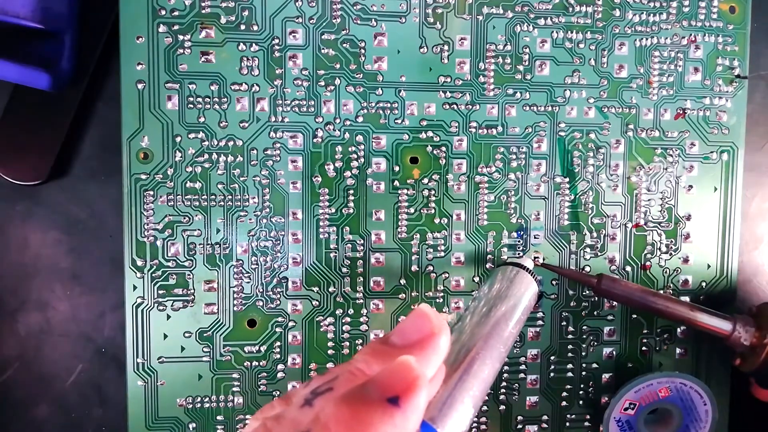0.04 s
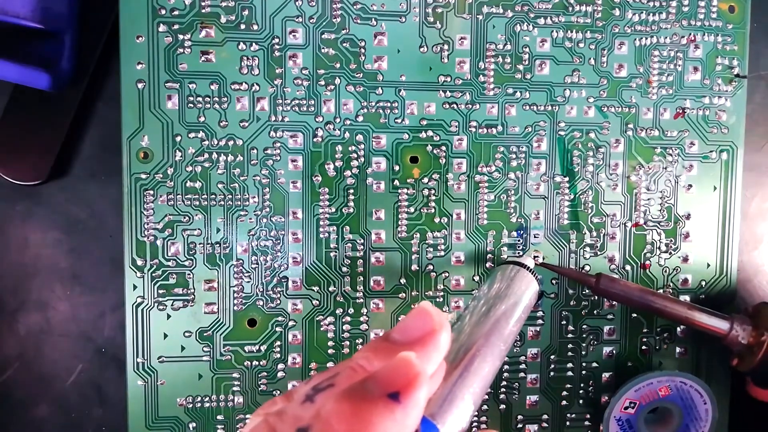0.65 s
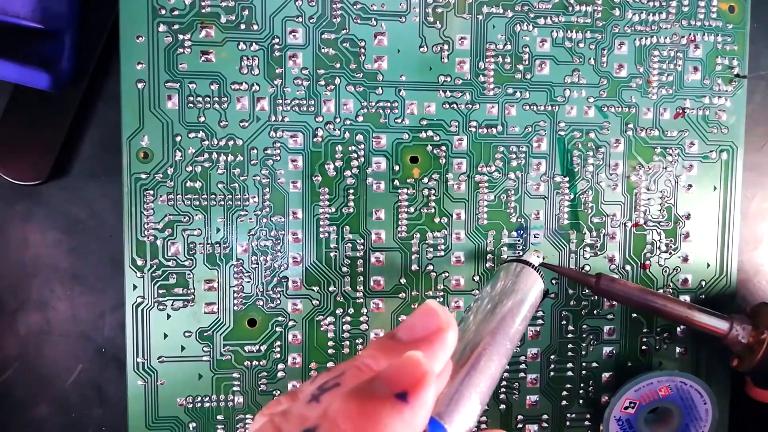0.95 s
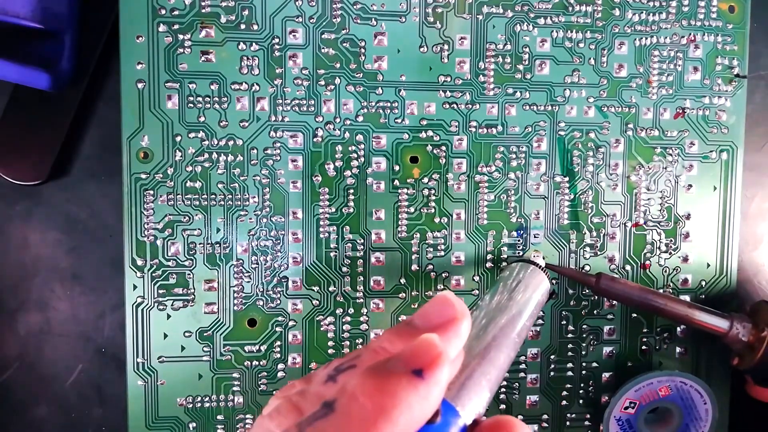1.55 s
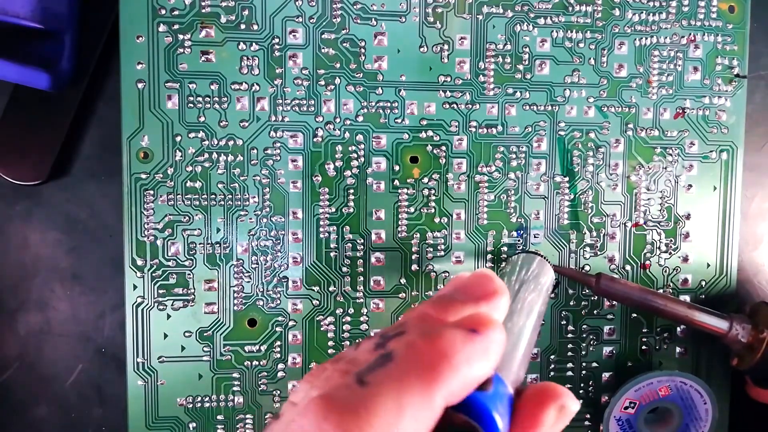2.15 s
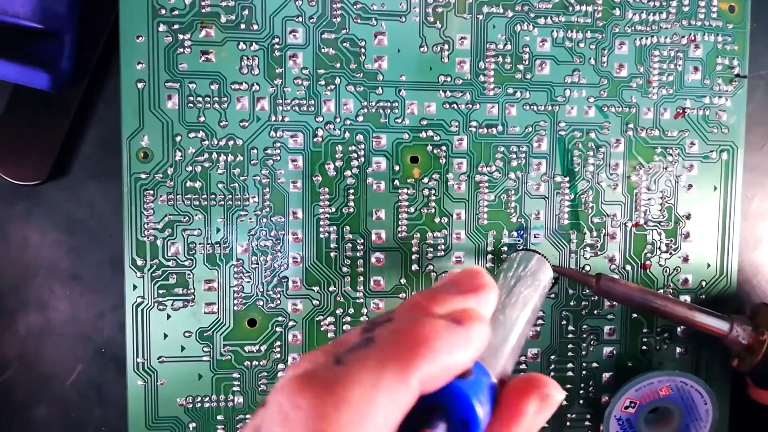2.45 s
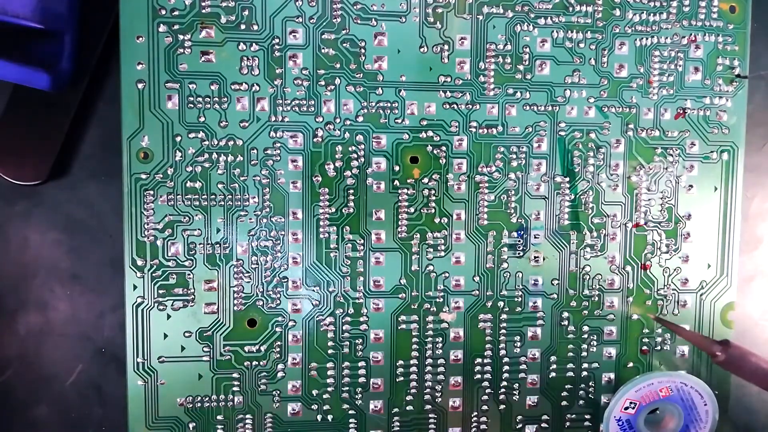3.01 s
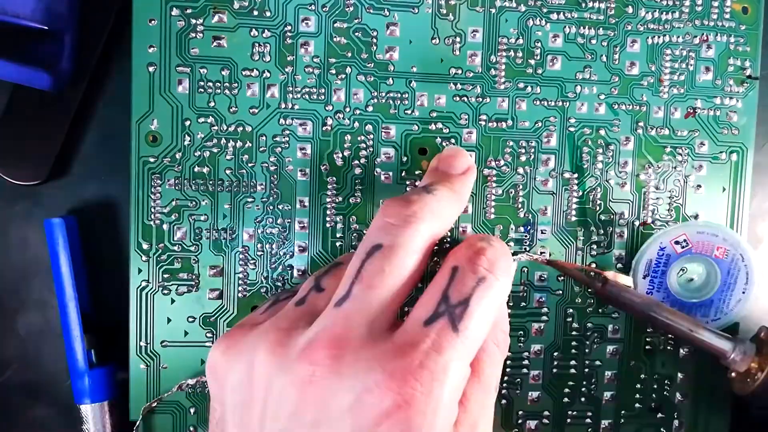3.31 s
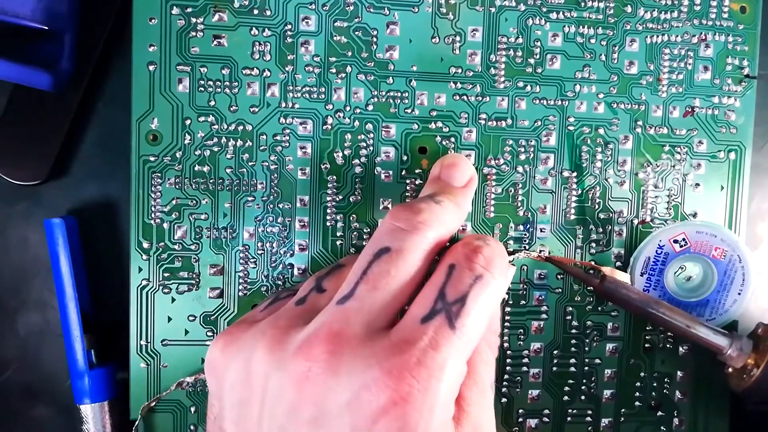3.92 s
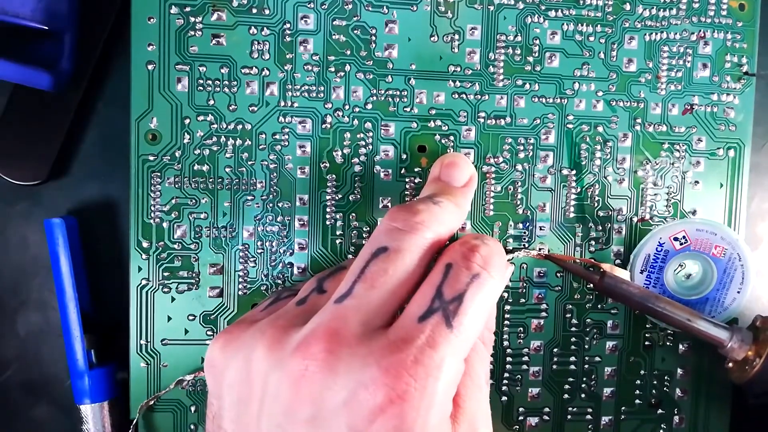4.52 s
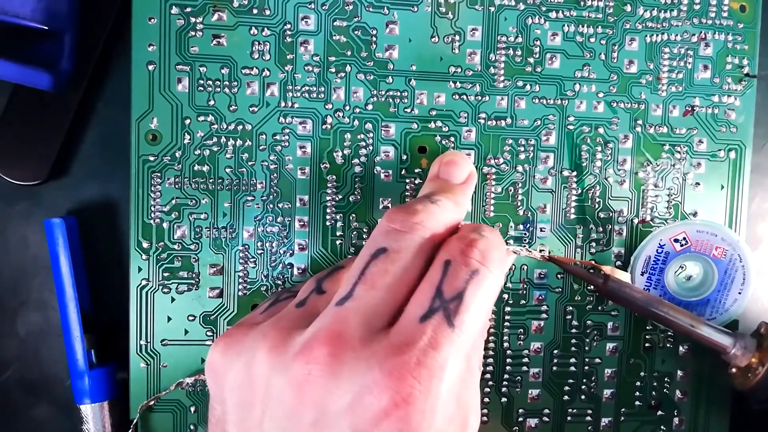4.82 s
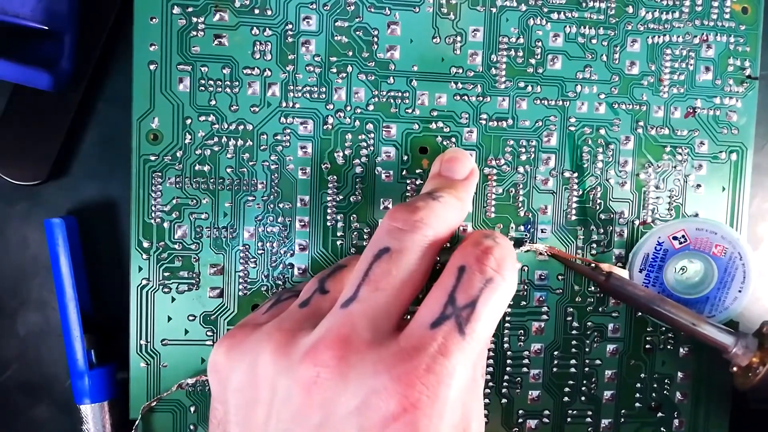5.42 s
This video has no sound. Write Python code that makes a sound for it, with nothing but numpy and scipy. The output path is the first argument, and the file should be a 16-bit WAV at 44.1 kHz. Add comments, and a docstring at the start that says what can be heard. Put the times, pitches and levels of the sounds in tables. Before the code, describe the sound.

Close up in a small workroom, a solder pump is set on a circuit board with a tick and a knock. Its plastic nozzle creaks in short runs, and flux sizzles faintly under a soldering iron. The plunger then snaps back sharply, the loudest sound, leaving the spring rattling and ringing briefly. Afterwards the iron pings once and tools tick, scratch and knock lightly over faint room hiss.

```python
"""A tick and a knock over faint room hiss: a solder pump is set down on a circuit board, close by.
Its nozzle creaks as it sticks and slips, and flux sizzles under the hot soldering iron. The pump's
plunger snaps back, leaving its spring and barrel ringing. Afterwards the iron pings once, and the
tools tick, scratch and knock lightly on the board. A small workroom adds a short echo."""
import sys
import numpy as np
from scipy import signal
from scipy.fft import rfft, irfft, next_fast_len
from scipy.io import wavfile
from scipy.ndimage import uniform_filter1d

SR = 44100
rng = np.random.default_rng(int(sys.argv[2]) if len(sys.argv) > 2 else 0)


def persist_wave(psi):
    """Save psi, clipped to +-1, as 16-bit WAV."""
    counts = np.round(np.clip(psi, -1, 1) * 32767).astype(np.int16)
    wavfile.write(sys.argv[1], SR, np.atleast_2d(counts).T)


N = 245306
T = np.arange(SR // 3) / SR  # seconds within one contact


def amp(db):
    """Turn decibels into a gain."""
    return 10 ** (np.asarray(db) / 20)


def unit(x):
    """Scale a sound to an average (rms) strength of 1."""
    return x / np.sqrt(np.mean(x ** 2) + 1e-20)


def blow(x):
    """Give a contact the energy of 4 ms of sound at strength 1."""
    return unit(x) * np.sqrt(.004 * SR / x.shape[-1])


def along(points, hz):
    """Read a curve of (pitch_hz, value) points at hz, on a log pitch scale."""
    pitches, values = np.transpose(points)
    return np.interp(np.log(hz + 1), np.log(pitches + 1), values)


def panned(db):
    """Left and right gains; a positive pan makes the left side louder."""
    return amp(np.array([[.5], [-.5]]) * db)


def coloured(x, gain):
    """Filter a sound by gain(hz), so that no ringing comes before its cause."""
    size = next_fast_len(x.shape[-1] // 2 + 4096) * 2
    cepstrum = irfft(np.log(np.maximum(gain(np.fft.rfftfreq(size, 1 / SR)), 1e-6)), size)
    cepstrum[..., 1:size // 2] *= 2
    cepstrum[..., size // 2 + 1:] = 0
    return irfft(rfft(x, size) * np.exp(rfft(cepstrum)), size)[..., :x.shape[-1]]


def add(track, start_s, sound):
    """Mix a sound into the track."""
    part = track[:, max(round(start_s * SR), 0):][:, :sound.shape[-1]]
    part += sound[..., :part.shape[1]]


def scattered(start_s, end_s, count):
    """Random moments, spread loosely over a stretch of time."""
    return start_s + (end_s - start_s) * (np.arange(count) + rng.random(count)) / count


def envelope(full_s, level_db, rise_s, hold_s, fade_s):
    """A gain that rises 60 dB in rise_s to its level at full_s, holds, then falls 60 dB in fade_s."""
    t = np.arange(N) / SR - full_s
    return amp(level_db - 60 * np.maximum(-t, 0) / rise_s - 60 * np.maximum(t - hold_s, 0) / fade_s)


def crack(fade_s, alike=0):
    """A burst of noise that falls 60 dB in fade_s; alike is the share both microphones have in common."""
    common = np.sqrt(alike) * rng.standard_normal(len(T))
    separate = np.sqrt(1 - alike) * rng.standard_normal((2, len(T)))
    return (common + separate) * amp(-60 * T / fade_s)


def ring(tones, t, spread, vary_db, drift=0):
    """Fading tones of a struck object; spread puts left and right out of step, drift roughens them."""
    hz, db, fade_s = np.transpose(tones)[:, :, None]
    strength = amp(db + vary_db * rng.standard_normal(hz.shape) - 60 * t / fade_s)
    wander = drift * np.cumsum(rng.standard_normal(strength.shape), axis=1) / np.sqrt(SR)
    offset = spread * rng.standard_normal((2, len(hz), 1))
    return np.sum(strength * np.sin(2 * np.pi * hz * t + wander + offset), axis=1)


def rustle(colour, grain_db):
    """Stereo noise whose strength flickers from millisecond to millisecond."""
    grain = unit(uniform_filter1d(rng.standard_normal(N), size=60))
    noise = rng.standard_normal((2, N)) * amp(grain_db * grain)
    return unit(coloured(noise, lambda hz: amp(along(colour, hz))))


def background():
    """The room rumbles under the microphones' own hiss; the level dips briefly around the snap."""
    # tone of the rumble and hiss: pitch_hz, level_db
    colour = [(12, -42), (20, -1), (48, -9), (81, -2), (182, -7), (216, -7.5), (347, -15.5), (607, -14.5),
              (759, -18), (976, -17), (1060, -17), (1570, -21.5), (2750, -23.5), (9140, -26.5),
              (16000, -33)]
    # their left-right balance: pitch_hz, pan_db
    balance = [(60, 0), (180, 0.0), (550, -1.0), (1650, 0), (4970, 0), (15000, 0.5)]
    # how alike the two sides are: pitch_hz, likeness (1 same, -1 opposite)
    likeness = [(60, 1), (180, 0.92), (550, -0.35), (1650, 0.2), (4970, -0.083), (15000, -0.027)]
    # the dip: start_s, fall_s, hold_s, recovery_s
    dip = (1.934, 0.021, 0.28, 0.22)

    def mid_and_side(hz):
        angle = np.arccos(np.clip(along(likeness, hz), -.99, .99)) / 2
        return amp(along(colour, hz)) * np.array([np.cos(angle), np.sin(angle)])

    mid, side = coloured(rng.standard_normal((2, N)), mid_and_side)
    noise = coloured(np.array([mid + side, mid - side]), lambda hz: panned(along(balance, hz)))
    dip_db = 8.5 * np.interp(np.arange(N) / SR, np.cumsum(dip), [0, 1, 1, 0])
    return amp(-60.5 - dip_db) * unit(noise)


def tip(level_db, tilt, pan_db, fade_s):
    """One contact of metal on solder; tilt brightens it, in dB per octave."""
    # tone of the contact: pitch_hz, level_db
    colour = [(400, -25.5), (1000, -6.5), (2000, -13), (3300, -4.5), (4300, -12), (5400, -7), (6600, -6),
              (8100, 0.5), (9200, -0.5), (11000, 1.5), (12500, -6.5), (15500, -4.5)]
    gain = lambda hz: amp(along(colour, hz) + tilt * np.log2(np.maximum(hz, 500) / 8000))
    return amp(level_db) * blow(coloured(crack(fade_s, alike=0.2), gain)) * panned(pan_db)


def ticks():
    """Metal tips touch the joints: short contacts tick, longer ones scratch."""
    # tips touching pins: start_s, level_db, pan_db
    taps = [(.2025, -36, 2), (1.816, -52.5, 4), (1.932, -54.5, 1), (2.0579, -52.5, 2), (2.0891, -47, 1.5),
            (2.3887, -48, -6.5), (2.4738, -49.5, -3), (2.531, -50.5, -3), (2.8468, -49, -4),
            (3.069, -53, 2), (3.635, -38.5, -0.5), (3.724, -53, 0), (5.304, -57.5, 1), (5.433, -57, 3)]
    # the tip scratching over solder: start_s, level_db, tilt_db_per_octave, pan_db
    scratches = [(4.718, -46, 2, 4), (4.7374, -40, 5, 0), (4.838, -36.5, -1.5, -2.5), (4.855, -42.5, -3, 1)]
    tip_shifts = [(start_s, -61, 0) for start_s in scattered(3.65, 5.2, count=5)]
    out = np.zeros((2, N))
    for start_s, level_db, pan_db in taps + tip_shifts:
        add(out, start_s, tip(level_db, tilt=-1.5, pan_db=pan_db, fade_s=0.022))
    for start_s, level_db, tilt, pan_db in scratches:
        add(out, start_s, tip(level_db, tilt, pan_db, fade_s=0.06))
    return out


def board(hz, place, vary_db):
    """The board favours certain pitches, in a mix set by where it is struck."""
    # the board's resonances: pitch_hz, width_hz, level_db, extra_at_edge_db
    resonances = [(320, 160, -17, 10), (695, 54, -3.5, -5), (754, 114, 3, -5), (955, 260, -5, 4.5),
                  (1140, 140, -7, 10.5), (1308, 120, -2, -2.5), (1545, 117, -6, -6.5),
                  (2360, 470, -29, -14.5)]
    gains = []
    for centre, width, level_db, edge_db in resonances:
        peak = (hz * width / np.abs(centre ** 2 - hz ** 2 + 1j * hz * width)) ** 1.14
        gains.append(amp(level_db + place * edge_db + rng.normal(0, vary_db)) * peak)
    return np.linalg.norm(gains, axis=0)


def knocks():
    """A push and a brief rattle shake the board; harder contacts are brighter."""
    # tools landing: start_s, relative_db, hardness_db_per_octave, place (-1 middle, 1 edge)
    landings = [(.203, -18, -2, 0.76), (.254, -34, 10, -.4), (0.3104, -37.5, 2.5, -0.79),
                (0.344, -43.5, 6, -0.32), (.5101, -38.5, 13, 0.0071), (1.816, -43, -5, 0.29),
                (2.1996, -34, 6, .7), (3.6716, -41.5, -1, 0.37), (3.724, -33, -11, 0.099),
                (3.833, -40.5, 3, -1.27), (3.894, -47.5, -5, 0.2), (4.2454, -25, -1, -1.55),
                (4.2515, -33.5, 4, -1.1), (4.672, -39, -6, 0.64), (4.71, -38, 5.5, -0.26),
                (4.751, -39.5, 8, -0.69), (4.862, -41.5, 3, 0.26), (4.8919, -40, -3.5, 0.89),
                (5.03, -38.5, -4.5, 1), (5.063, -42.5, -3, .95), (5.113, -41, -2, 1)]
    # each tool grazes the board just before it lands
    grazes = [(s - 0.00338, db - 18.5, hardness, place) for s, db, hardness, place in landings]
    # light touches while the hand takes a new hold
    touches = [(s, rng.normal(-50.5, 1.5), 0, rng.uniform(-1, 1)) for s in scattered(3.3, 3.65, count=4)]
    pump_lift_s, firm_db = 2.7, -40
    out = np.zeros((2, N))
    for start_s, db, hardness, place in landings + grazes + touches:
        fade_s = 0.027 if start_s < pump_lift_s else 0.058  # the pressing pump damps the board
        fade_s *= amp(-0.29 * max(db - firm_db, 0))  # firm knocks rattle for less long
        force = blow(crack(fade_s, alike=0.72) * (1 - np.exp(-T / 0.00062)))
        force[:, 0] += 9  # the push
        tilt = lambda hz: amp(hardness * np.log2(np.clip(hz, 400, 2400) / 1000))
        contact = lambda hz: tilt(hz) / (1 + (hz / 2800) ** 8)
        knock = coloured(force, lambda hz: board(hz, place, vary_db=2.5) * contact(hz))
        add(out, start_s, amp(db - 7.5) * blow(knock))
    return out * panned(-3.0)


def thumps():
    """Firm pushes rock the board on the bench, which gives off little deep bass."""
    # pushes that reach the bench: start_s, relative_db, hardness_db_per_octave
    pushes = [(.203, -36, 3.5), (.251, -46.5, -10), (1.815, -40, 1), (1.891, -54, -3), (2.184, -37, -2.5),
              (2.474, -51.5, 2), (3.724, -51.5, 2), (4.756, -49.5, 2)]
    # the bench's low tones: pitch_hz, level_db, fade_s
    bench = [(87.6, -2, 0.19), (118, 0, 0.14), (140, 2.5, 0.13), (194, -2.5, 0.082), (239.6, -5, 0.094),
             (375, -11.5, 0.06)]
    onset = 1 - np.exp(-T / 0.00099)
    out = np.zeros((2, N))
    for start_s, push_db, hardness in pushes:
        tones = [(hz, db + hardness * np.log2(hz / 140), fade_s) for hz, db, fade_s in bench]
        thump = ring(tones, T, spread=.04, vary_db=0.5) * onset
        add(out, start_s, amp(push_db + 7) * blow(thump))
    return coloured(out, lambda hz: hz ** 2 / np.hypot(hz ** 2, 65 ** 2))


def slide():
    """The nozzle rubs smoothly over the board before it catches."""
    # tone of the rubbing: pitch_hz, level_db
    colour = [(700, -3), (2000, -5.5), (3100, -5.5), (4300, -13), (5400, -18), (7000, -4), (10000, -0.5),
              (13500, -6), (16000, -8.5)]
    # the sliding move: full_s, level_db, rise_s, hold_s, fade_s
    move = (.315, -49, .17, .065, .25)
    return envelope(*move) * rustle(colour, grain_db=2.5) * panned(2.7)


def slip_times(first_s, stuck_s, last_s, count, slowing):
    """The nozzle breaks away once, sticks, then slips in a run that may slow toward its end."""
    progress = np.linspace(0, 1, count - 1)
    progress -= slowing * progress * (1 - progress)
    run = first_s + stuck_s + (last_s - first_s - stuck_s) * progress
    return np.append(first_s, run) + rng.normal(0, .0005, count)


def creak():
    """The nozzle sticks and slips: each slip is a tick and a swell of plastic vibration."""
    # pushes on the nozzle: first_slip_s, stuck_s, last_slip_s, slip_count, slowing (0 to 1)
    pushes = [(.3522, .0105, .4244, 8, 0), (.4392, .0118, .485, 5, 0), (.5101, .0125, .5327, 3, 0),
              (.553, .0105, .6459, 12, .04), (.7209, .0176, .7841, 7, 0), (.8397, .0312, .9158, 8, .18),
              (.9775, .0207, 1.0502, 6, .4)]
    # pressure on the nozzle, as the strength of a slip: time_s, relative_db
    pressure = [(.39, -44.5), (.45, -39), (.52, -35.5), (.75, -35), (1.05, -38)]
    # tone of the plastic: pitch_hz, relative_db
    colour = [(180, -53), (300, -38), (405, -22.5), (774, -5.5), (1040, -9), (1390, -5.5), (1900, -17),
              (2610, -6.5), (3890, -13), (4520, 0), (5250, -13.5), (5800, -5.5), (7440, -6.5), (12100, -1),
              (16000, -7.5)]
    # its left-right balance: pitch_hz, pan_db
    balance = [(300, 0), (750, -12), (1400, 0.5), (2600, -4.5), (3400, 19), (5000, -4), (10000, 4),
               (13000, 10)]
    swell = 1 - np.exp(-T / .0009)
    shell = crack(fade_s=.010, alike=.3)  # every slip shakes the same shell
    slips = np.zeros((2, N))
    for push in pushes:
        times = slip_times(*push)
        levels_db = np.interp(times, *np.transpose(pressure))
        levels_db[0] += 1  # breaking away takes extra force
        for start_s, db in zip(times, levels_db):
            variation = amp(-3) * crack(fade_s=.012)
            slip = blow((shell + variation) * swell)
            slip[:, 0] += 4.5  # the tick
            add(slips, start_s, amp(db + rng.normal(0, 0.9)) * slip)
    return coloured(slips, lambda hz: amp(along(colour, hz) + 2.5) * panned(along(balance, hz)))


def sizzle():
    """Flux, the cleaning paste in solder, boils off the hot joint."""
    # a slow simmer and one spit: full_s, level_db, rise_s, hold_s, fade_s
    boils = [(1.92, -65.5, 1, 0.021, 0.09), (1.824, -47.5, .035, 0.011, 0.094)]
    # tone of the boiling: pitch_hz, level_db
    colour = [(1000, -13), (6500, -16), (8500, -7), (10000, 5.5), (12500, -6.5), (13800, -17),
              (14800, -14.5), (16000, -32)]
    return sum(envelope(*boil) for boil in boils) * rustle(colour, grain_db=4.0) * panned(-5.0)


def pump():
    """The plunger flies back and strikes its stop; spring and barrel ring on."""
    # release, blow and rebound: start_s, level_db, fade_s, tilt_db_per_octave, pan_db
    hits = [(2.1825, -26.5, 0.067, 1.5, -4.5), (2.187, -22, 0.015, 3, -3.5), (2.199, -21, 0.017, 0, 2)]
    # tone of the snap: pitch_hz, level_db
    colour = [(150, -37), (250, -6), (557, -15), (802, -6.5), (1420, -9.5), (1730, -4.5), (2320, -8),
              (3010, -5), (3230, -13), (3840, -7.5), (4190, -13.5), (5630, -15), (6360, -13), (10500, -6.5),
              (16000, -34)]
    # its left-right balance: pitch_hz, pan_db
    balance = [(300, 7), (700, -6), (1200, -0.5), (1700, 13), (2700, -4), (5000, 0.5), (10000, -7),
               (14000, -2)]
    # the spring's tones: pitch_hz, relative_db, fade_s
    spring_tones = [(1790, -4.5, 0.35), (2410, -14.5, .25), (2710, -11, 0.2), (3030, -17, 0.26),
                    (3350, -13, 0.27), (4969, -25, .23), (6000, -9, .4), (6950, -11, .25), (7800, -9, 0.49),
                    (9100, -8.5, .3), (10000, -20, .33), (10100, -21, 0.51), (11550, -1, .3),
                    (12000, -2, .26), (15150, -7, .24)]
    # the barrel's tones: pitch_hz, relative_db, fade_s
    barrel_tones = [(4300, -10, 3), (7770, -6.5, 2.6), (8300, -2, 0.98), (8200, -1, .8), (10000, -3, 0.81),
                    (10350, -2, 1.2), (11100, -6, 0.71), (11100, -12, 1.1)]
    out, t = np.zeros((2, N)), np.arange(SR) / SR
    for start_s, level_db, fade_s, tilt, pan_db in hits:
        gain = lambda hz: amp(along(colour, hz) + tilt * np.log2(np.maximum(hz, 500) / 4000))
        hit = coloured(crack(fade_s), lambda hz: gain(hz) * panned(along(balance, hz)))
        add(out, start_s, amp(level_db) * blow(hit) * panned(pan_db))
    spring = ring(spring_tones, t, spread=2, vary_db=1, drift=12)
    barrel = ring(barrel_tones, t, spread=2, vary_db=1, drift=20)
    rebound_s, grip_s = hits[-1][0], 2.55
    damping = amp(-60 * np.maximum(rebound_s + t - grip_s, 0))  # the hand closes on the barrel
    add(out, rebound_s, amp(-39.5) * spring + amp(-56.0) * barrel * damping)
    return out


def coils():
    """The spring's coils rattle inside the barrel, stirring many closely spaced resonances."""
    # a chatter, then a faint rattle: full_s, level_db, rise_s, hold_s, fade_s
    rattles = [(2.2, -44, .028, 0.097, 0.23), (2.52, -62.5, 0.59, 0.047, 2.5)]
    # tone of the coils: pitch_hz, level_db
    colour = [(240, -49), (400, -14), (553, -11), (607, -39), (687, -21), (893, -9), (1250, -18),
              (1760, -13), (4050, -8), (7400, -8), (7990, -3), (10200, 1.5), (16000, -14.5)]
    grid_hz = np.linspace(0, SR / 2, num=300)
    peaks_db = 4.5 * np.clip(rng.standard_normal(len(grid_hz)), -2, 1)
    chatter = coloured(rustle(colour, grain_db=2.5), lambda hz: amp(np.interp(hz, grid_hz, peaks_db)))
    return sum(envelope(*rattle) for rattle in rattles) * unit(chatter) * panned(-1.1)


def shaft():
    """The iron's shaft pings once as the tools are lifted away."""
    # the shaft's tones: pitch_hz, relative_db, fade_s
    tones = [(3400, 4.5, 0.014), (3820, -4.5, 0.029), (5130, -9, 0.088), (5500, -20, 0.069),
             (8450, -8, 0.079), (10450, 2.5, 0.079), (12000, -10, 0.064)]
    ping = blow(ring(tones, T, spread=1, vary_db=4.5, drift=37))
    out = np.zeros((2, N))
    add(out, start_s=2.847, sound=amp(-42.5) * ping * panned(-7.5))
    return out


def room(x, near_db, tail_db):
    """Sound bounces off the bench top, then briefly between the walls; neither echo has much bass."""
    # how long the walls' echo lasts: pitch_hz, fade_s
    fades = [(150, 0.54), (1000, 0.18), (5000, 0.2), (14000, 0.12)]
    hz, t, spectrum = signal.stft(rng.standard_normal((2, SR // 2)), SR, nperseg=256)
    spectrum *= amp(-60 * t / along(fades, hz)[:, None])
    tail = signal.istft(spectrum, SR, nperseg=256)[1][:, :len(T)]
    near = crack(fade_s=.05)
    echo = amp(tail_db) * tail / np.linalg.norm(tail[0]) + amp(near_db) * near / np.linalg.norm(near[0])
    echo = coloured(echo, lambda hz: hz / np.hypot(hz, 400))
    delayed = np.pad(echo, ((0, 0), (SR // 300, 0)))
    return signal.fftconvolve(x, delayed, axes=1)[:, :N]


def scene():
    """The work on the bench and its echo, over the background."""
    work = ticks() + knocks() + thumps() + slide() + creak() + sizzle() + pump() + coils() + shaft()
    return background() + work + room(work, near_db=-8.5, tail_db=-10.5)


def record(dry):
    """The recorder cuts off the very highest treble."""
    top_hz = 15850
    size = next_fast_len(N + SR // 2)
    return irfft(rfft(dry, size) * (np.fft.rfftfreq(size, 1 / SR) < top_hz), size)[:, :N]


dry = scene()
out = record(dry)
persist_wave(out)
```